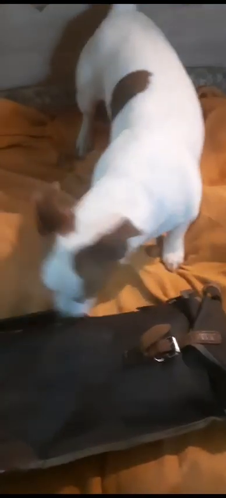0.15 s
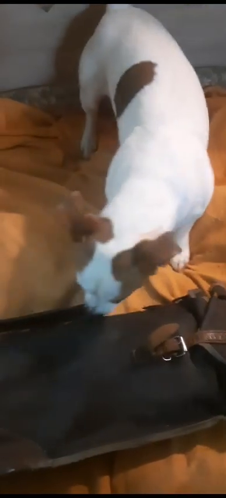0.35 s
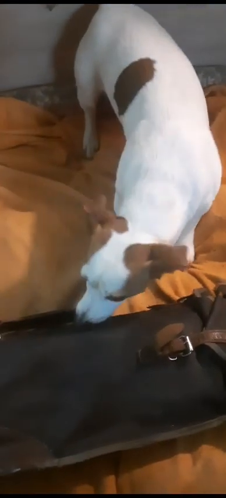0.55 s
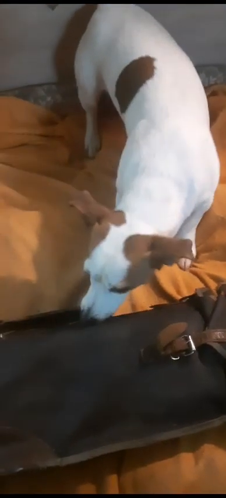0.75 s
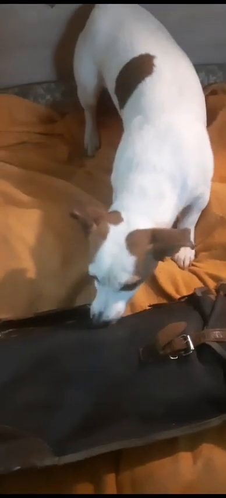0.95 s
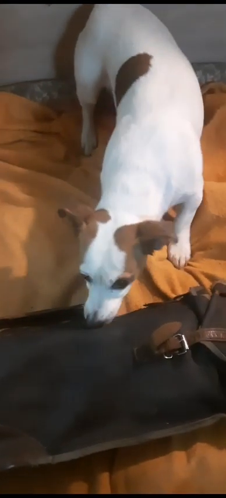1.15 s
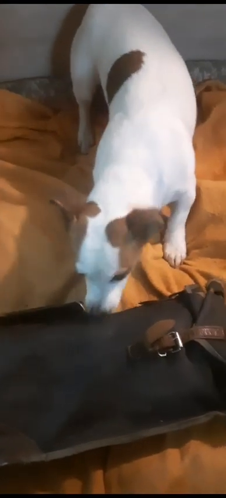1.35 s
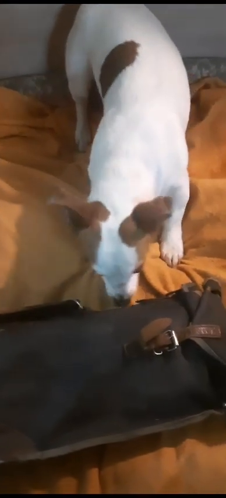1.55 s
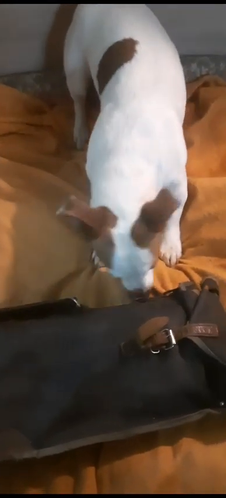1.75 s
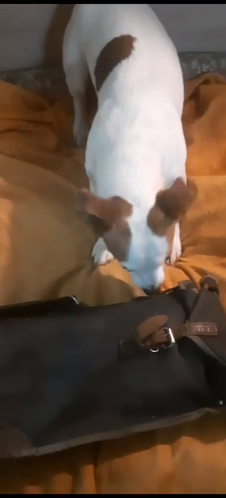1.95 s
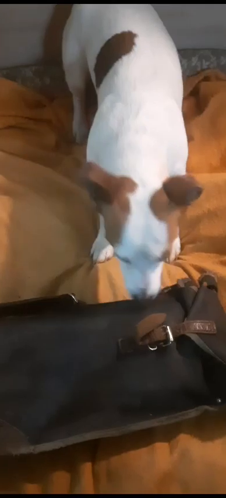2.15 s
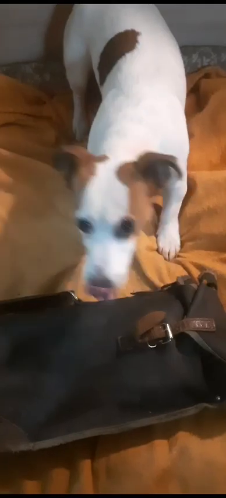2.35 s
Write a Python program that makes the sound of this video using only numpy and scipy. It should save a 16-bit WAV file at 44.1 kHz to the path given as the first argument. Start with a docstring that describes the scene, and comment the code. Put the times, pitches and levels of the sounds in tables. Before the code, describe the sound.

A small dog whimpers close to the microphone, a loud piercing squeak early, then weaker squeaks and low nasal whines with thin whistles, a quieter middle, two more squeaks and sniffs in a quiet furnished room.

```python
"""Furnished room: a small dog whimpers close by.
Sine partials make its voice, flipping between piercing, nearly pure squeaks and nasal whines an octave lower;
a thin whistle rides on the whines and noise bursts ring as creaks. Shaped noise gives nose air and the soft
contacts of snuffling at a bag. Faint floor noise and a low hum stay underneath."""
import sys
import numpy as np
from scipy import signal
from scipy.fft import rfft, irfft, next_fast_len
from scipy.io import wavfile
from scipy.ndimage import uniform_filter1d, minimum_filter1d, map_coordinates

SR = 44100
rng = np.random.default_rng(int(sys.argv[2]) if len(sys.argv) > 2 else 0)


def inscribe(sig):
    """Save sig as 16-bit PCM at rate SR to the path in sys.argv[1].

    A 1-D sig is mono; a 2-D sig holds one channel per row.
    Samples are clipped to [-1, 1] before scaling.
    """
    pcm = np.round(np.clip(np.atleast_2d(sig).T, -1, 1) * 32767)
    wavfile.write(sys.argv[1], SR, pcm.astype(np.int16))


N = 110250
T = np.arange(N) / SR


def amp(db):
    """Amplitude factor of a level in dB."""
    return 10 ** (np.asarray(db) / 20)


def unit(x):
    """x scaled to rms 1."""
    return x / np.sqrt(np.mean(x ** 2) + 1e-20)


def along(points, hz):
    """(Hz, value) points interpolated on a log frequency axis."""
    f, v = np.transpose(points)
    return np.interp(np.log(hz + 1), np.log(f + 1), v)


def wobble(rate_hz):
    """Smooth random curve, rate_hz knots a second."""
    knots = rng.standard_normal(int(N * rate_hz / SR) + 4)
    return map_coordinates(knots, [T * rate_hz])


def puff(peak_s, half_s):
    """Bell-shaped swell; half_s runs from the peak to 1/e."""
    return np.exp(-((T - peak_s) / half_s) ** 2)


def filtered(x, response):
    """x times a complex response of frequency."""
    m = next_fast_len(N + SR // 2)
    return irfft(rfft(x, m) * response(np.fft.rfftfreq(m, 1 / SR)), m)[..., :N]


def resonance(x, hz, width_hz):
    """One causal resonance, applied twice for steep skirts."""
    def response(f):
        damping = 1j * f * width_hz
        return (damping / (hz * hz - f * f + damping)) ** 2
    return filtered(x, response)


def noise(colour, apart):
    """Coloured stereo noise of rms 1; apart is the part that each side has to itself."""
    white = rng.standard_normal(N) + apart * rng.standard_normal((2, N))
    return unit(filtered(white, lambda f: amp(along(colour, f))))


def panned(x, pan_db):
    """Left and right, pan_db apart, with the mean amplitude kept."""
    gains = amp([[pan_db / 2], [-pan_db / 2]])
    return x * gains / gains.mean()


def blurred(phase):
    """A partial roughened by turbulence: random phase unrest, different on each side."""
    unrest_rad, unrest_hz = 0.29, 712.4
    return np.sin(phase + unrest_rad * np.array([wobble(unrest_hz), wobble(unrest_hz)]))


def call(rows, jitter, shimmer_db):
    """Pitch, phase and one gain per level column of a call; the source is unsteady in pitch and level."""
    edge_s = .0065  # fades lie outside the first and last row
    s, hz, *levels = np.transpose(rows)
    glide_hz = uniform_filter1d(np.interp(T, s, hz), size=400)
    hz = glide_hz * (1 + jitter * (wobble(100) + wobble(600)))
    phase = 2 * np.pi * np.cumsum(hz) / SR
    ramp = np.clip(np.minimum(T - s[0], s[-1] - T) / edge_s + 1, 0, 1)
    gate = np.sqrt(2) * np.sin(ramp * np.pi / 2) ** 2  # sqrt(2): sine levels are rms
    gains = [gate * amp(np.interp(T, s, db) + shimmer_db * wobble(120)) for db in levels]
    return hz, phase, gains


def background():
    """Quiet room noise and a low sine hum that fades and returns."""
    # hum: t/s, rms level/dB
    hum_levels = [(0, -77.5), (.25, -65.5), (1.4, -77.5), (2.35, -65)]
    # room noise spectrum: f/Hz, relative level/dB
    floor_colour = [(90, -5.5), (200, -11), (700, -8.5), (2000, -21.5), (15000, -47)]
    hum_hz, floor_db = 66.5, -71
    hum_gain = amp(np.interp(T, *np.transpose(hum_levels)))
    hum = hum_gain * np.sqrt(2) * np.sin(2 * np.pi * hum_hz * T)
    return hum + amp(floor_db) * noise(floor_colour, apart=1.0)


def squeaks():
    """High register: strong fundamental, its octave, blurred upper overtones and a swell of raspy air."""
    # high squeaks, one curve each: t/s, pitch f/Hz, fundamental level/dB, octave level/dB
    curves = [
        [(.195, 1815, -18, -36), (.226, 1878, -19.5, -33)],
        [(.426, 1305, -27, -39), (.443, 1678, -13, -14.5), (.461, 1818, -7.5, -20), (.495, 1951, -6, -23),
         (.535, 1970, -13.5, -44.5), (.566, 1937, -19, -64)],
        [(.782, 1238, -33, -70.5), (.825, 1335, -32.5, -40.5), (.883, 1615, -22, -29), (.91, 1500, -25, -27),
         (.933, 1082, -25.5, -51)],
        [(1.699, 1824, -33.5, -58.5), (1.712, 1696, -31, -47), (1.736, 1883, -21, -56.5),
         (1.782, 2030, -37, -55.5)],
        [(1.996, 1652, -25.5, -38), (2.026, 1750, -18, -33), (2.052, 1919, -12, -41.5), (2.092, 1893, -24, -40)],
    ]
    # each squeak: left minus right of the fundamental/dB, rasp peak level/dB
    tones = [(5.5, -42.5), (-3, -39), (-6.5, -50.5), (0, -49), (0, -41)]
    # upper overtones by frequency: f/Hz, level/dB re capped fundamental
    overtone_colour = [(5400, -29.5), (8000, -42.5), (9700, -58.5), (11800, -47), (15000, -63)]
    # rasp spectrum: f/Hz, relative level/dB
    rasp_colour = [(400, -41), (1500, -5.5), (2300, -9), (2900, 1), (4300, -14), (8000, -21.5),
                   (13000, -40.5)]
    rasp_peak, rasp_half = 0.68, 0.59  # fractions of the call length
    overtone_cap_db = -8  # the gain driving the overtones grows no further
    out = 0
    for rows, (pan_db, rasp_db) in zip(curves, tones):
        hz, phase, (gain, octave_gain) = call(rows, jitter=0.0016, shimmer_db=2.68)
        fundamental = gain * panned(np.sin(phase), pan_db)
        octave = octave_gain * np.sin(2 * phase)
        upper = sum(amp(along(overtone_colour, k * hz)) * blurred(k * phase) for k in range(3, 10))
        overtones = np.minimum(gain, amp(overtone_cap_db)) * upper
        start_s, end_s = rows[0][0], rows[-1][0]
        length_s = end_s - start_s
        swell = amp(rasp_db) * puff(start_s + rasp_peak * length_s, rasp_half * length_s)
        rasp = swell * noise(rasp_colour, apart=0.23)
        out = out + fundamental + octave + overtones + rasp
    return out


def bumps():
    """Soft, dull contacts: resonant noise with a sudden onset and exponential decay."""
    # contacts: t/s, level at onset/dB, resonance f/Hz
    contacts = [(0.233, -49, 150.7), (1.267, -55, 648)]
    t60_s = 0.16
    out = 0
    for s, db, hz in contacts:
        decay = amp(db - 60 * np.abs(T - s) / t60_s) * (T > s)
        out = out + decay * unit(resonance(rng.standard_normal(N), hz, 0.5 * hz))
    return out


def whistles(folds):
    """A second, very high oscillator in the nose; the whine's fold motion puts sidebands on it."""
    # thin whistles, one curve each: t/s, pitch f/Hz, level before shaking and nose/dB
    curves = [
        [(.238, 4595, -48.5), (.268, 4460, -46.5)],
        [(.607, 4284, -44.5), (.752, 4220, -47)],
        [(.93, 4172, -44), (.985, 4030, -68)],
        [(1.358, 4197, -58), (1.425, 4260, -56.5)],
        [(1.8, 5200, -54.5), (1.832, 4440, -50), (1.855, 4000, -62.5), (1.925, 3860, -64.5)],
        [(2.122, 4500, -41.5), (2.148, 4120, -40), (2.168, 3980, -51), (2.255, 3753, -56.5)],
    ]
    # each whistle: octave level/dB re fundamental before the nose, depth of shaking by the whine
    tones = [(-12, 0.66), (-18.5, 1.0), (-6, .5), (-16.5, 1.37), (-8, 0.6), (-5.5, 1.03)]
    # nose response: f/Hz, gain/dB
    nose = [(3400, 4), (6000, -3), (7800, 10.5), (10000, -25)]
    out = 0
    for rows, (octave_db, depth) in zip(curves, tones):
        hz, phase, (gain,) = call(rows, jitter=0.0054, shimmer_db=2.0)
        tone = blurred(phase) + amp(octave_db) * blurred(2 * phase)
        out = out + gain * tone * np.exp(depth * folds)
    return filtered(out, lambda f: amp(along(nose, f)))


def whines():
    """Low register with evenly fading overtones; also returns the fold motion that shakes the whistle."""
    # low whines, one curve each: t/s, pitch f/Hz, fundamental level/dB
    curves = [
        [(0.242, 968, -33.5), (0.272, 946.4, -34.5)],
        [(.29, 860, -50), (0.375, 792, -57), (0.41, 727, -27.5), (0.426, 678.5, -36)],
        [(0.58, 900, -37), (0.65, 858, -48.5), (.74, 771, -39), (0.772, 710, -31.5)],
        [(1.335, 946.4, -47.5), (1.383, 911, -48), (1.468, 729, -44)],
        [(1.48, 503, -50.5), (1.522, 462, -42.5)],
        [(1.83, 701, -38.5), (1.91, 748, -44.5)],
        [(2.124, 779, -37.5), (2.174, 767.6, -29), (2.2, 756, -39)],
    ]
    # each whine: left minus right of the fundamental/dB, octave level/dB re fundamental,
    # fall per further overtone/dB
    tones = [(0, 0.5, 5.5), (-3.5, -10.5, 13.5), (-7.5, -13, 5), (-6.5, -13.5, 4), (-3, -18, 13.5),
             (-5.5, -12, 17.5), (-13, -17, 3), (-14, -16, 6)]
    out, folds = 0, 0
    for rows, (pan_db, octave_db, fall_db) in zip(curves, tones):
        hz, phase, (gain,) = call(rows, jitter=0.0041, shimmer_db=3.0)
        overtones = sum(amp(octave_db - fall_db * k) * blurred((k + 2) * phase) for k in range(6))
        out = out + gain * (panned(np.sin(phase), pan_db) + overtones)
        folds = folds + (gain > 0) * np.sin(phase)
    return out, folds


def air():
    """Puffs of air through the dog's nose: coloured noise with fluttering flow."""
    # puffs: peak t/s, half width to 1/e/s, peak level before flutter/dB
    puffs = [(0.26, 0.081, -49.5), (.935, 0.038, -52), (1.439, 0.12, -64), (2.209, 0.08, -50.5),
             (2.345, 0.06, -46.5)]
    # air spectrum: f/Hz, relative level/dB
    air_colour = [(200, 1), (1100, 14), (2100, -7), (3200, 2), (8000, -5.5), (12000, -19)]
    flutter_db, flutter_hz = 1.5, 81
    flow = sum(amp(db) * puff(s, half_s) for s, half_s, db in puffs)
    return flow * amp(flutter_db * wobble(flutter_hz)) * noise(air_colour, apart=1.0)


def creaks():
    """The voice breaks up: uneven bursts of air ring the throat resonance."""
    # creaks: start t/s, length/s, level/dB before panning, resonance f/Hz
    breaks = [(0.769, 0.046, -47.5, 793), (0.935, 0.028, -37, 1024), (1.514, 0.027, -51, 1094),
              (2.2, .028, -40, 580), (2.306, 0.018, -43.5, 810), (2.332, 0.015, -45, 1114)]
    width_hz, lump_db, lump_hz = 650, 4, 260
    out = 0
    for s, length_s, db, hz in breaks:
        bursts = rng.standard_normal(N) * amp(lump_db * wobble(lump_hz))
        progress = np.clip((T - s) / length_s, 0, 1)
        envelope = np.sqrt(np.abs(np.sin(np.pi * progress)))
        out = out + amp(db) * unit(resonance(bursts, hz, width_hz)) * envelope
    return panned(out, -6)


def room(x):
    """Direct sound, a few near surfaces and a short diffuse tail."""
    t60_s, tail_db, walls_db = 0.2, -21, -15
    left_lead_s, max_lead_rad = 0.00017, 1.744  # left hears the dog first; phase gap levels off in the treble
    t = T[:SR // 3]
    tail = rng.standard_normal((2, len(t))) * amp(-60 * t / t60_s) * (t > .005)
    walls = np.zeros_like(tail)
    for side in walls:
        delays_s = rng.uniform(.002, .018, size=8)
        side[(SR * delays_s).astype(int)] = rng.standard_normal(8)
    answer = 0
    for db, h in [(tail_db, tail), (walls_db, walls)]:
        answer = answer + amp(db) * h / np.linalg.norm(h, axis=1, keepdims=True)

    def ear_phases(f):
        lead_rad = max_lead_rad * np.tanh(2 * np.pi * f * left_lead_s / max_lead_rad)
        return np.exp(1j * lead_rad / 2 * np.array([[1], [-1]]))

    direct = filtered(x, ear_phases)
    return direct + signal.fftconvolve(x.mean(0)[None], answer, axes=1)[:, :N]


def scene():
    """The dog's sounds in the room, over the background."""
    whine, folds = whines()
    dog = squeaks() + bumps() + whistles(folds) + whine + air() + creaks()
    return room(dog) + background()


def record(dry):
    """The recorder eases its gain down on the loudest peaks and keeps nothing above its band limit."""
    ceiling, top_hz = .9, 15800
    needed = ceiling / np.maximum(np.abs(dry).max(axis=0), ceiling)
    gain = uniform_filter1d(minimum_filter1d(needed, size=600), size=500)
    return filtered(dry * gain, lambda hz: hz < top_hz)


dry = scene()
out = record(dry)
inscribe(out)
```